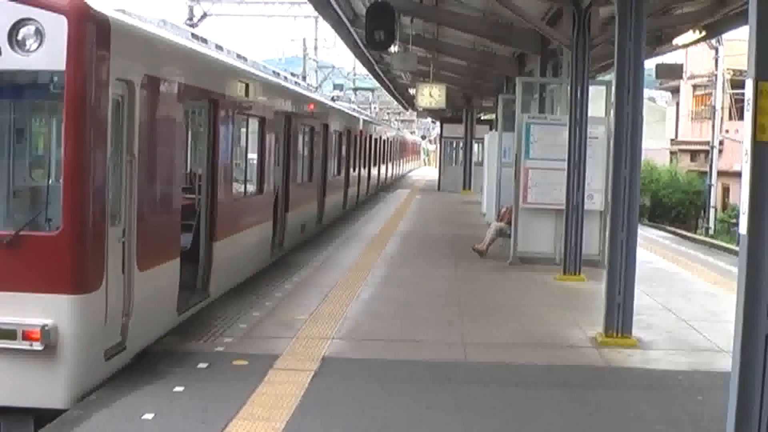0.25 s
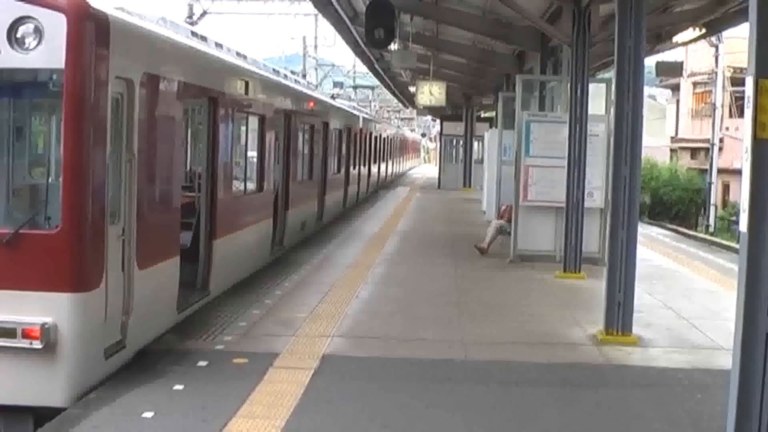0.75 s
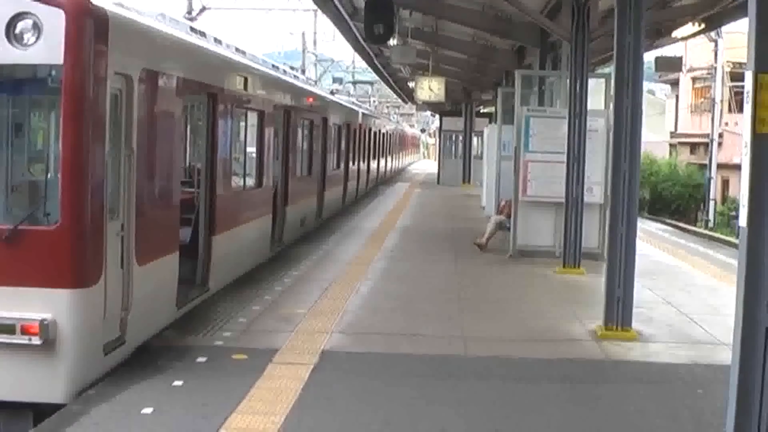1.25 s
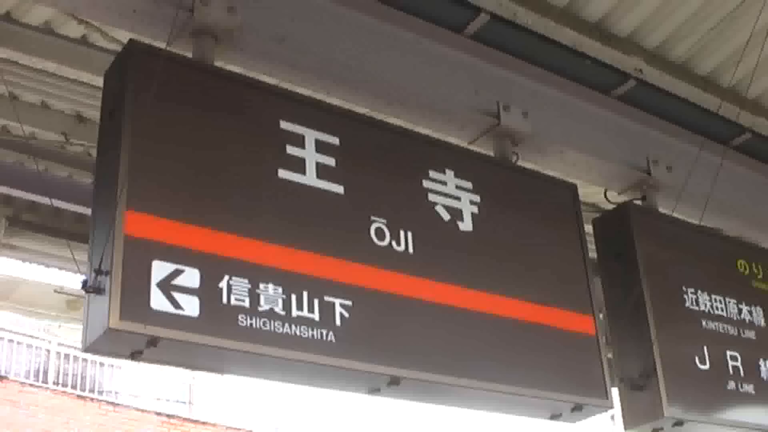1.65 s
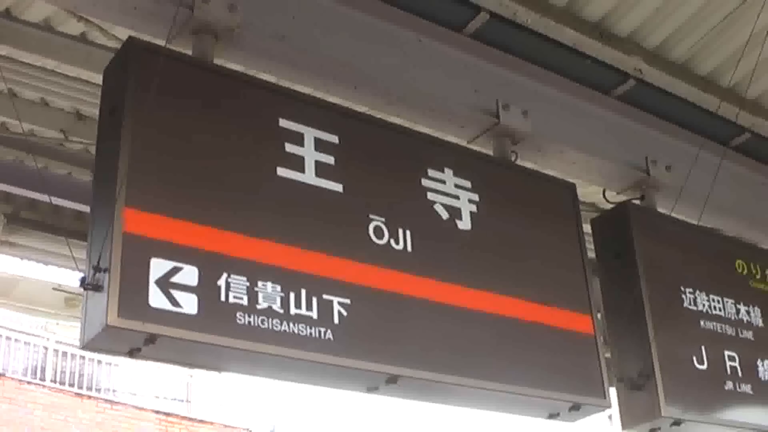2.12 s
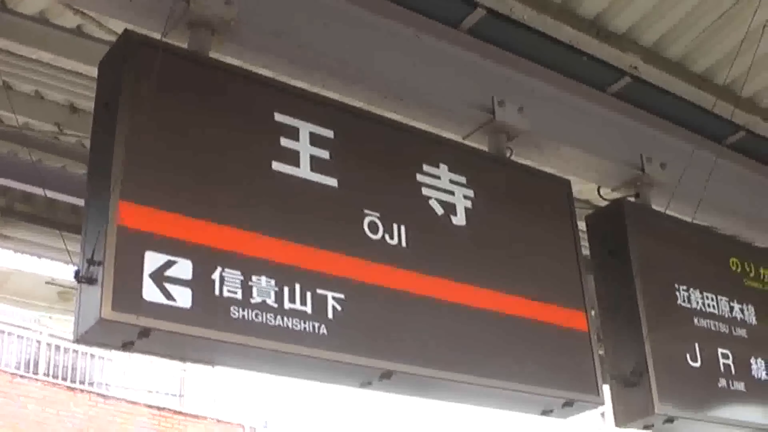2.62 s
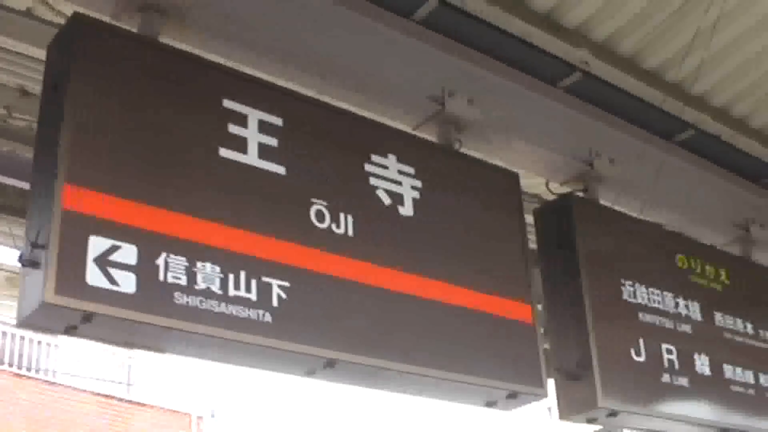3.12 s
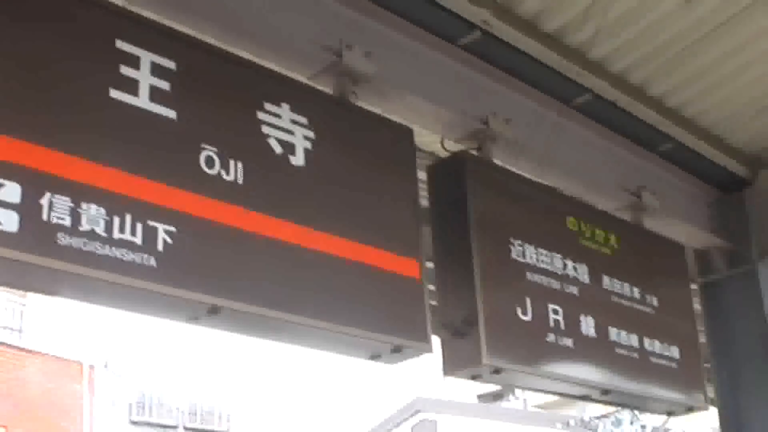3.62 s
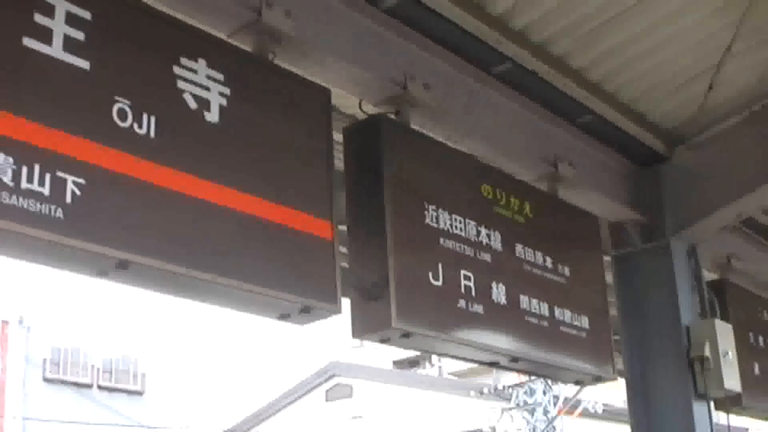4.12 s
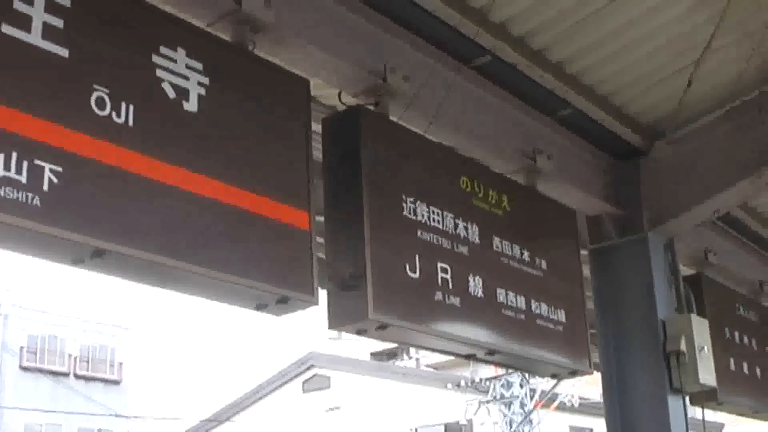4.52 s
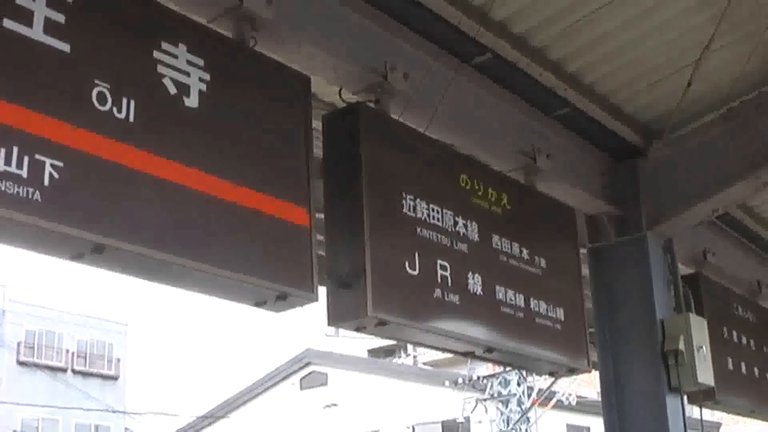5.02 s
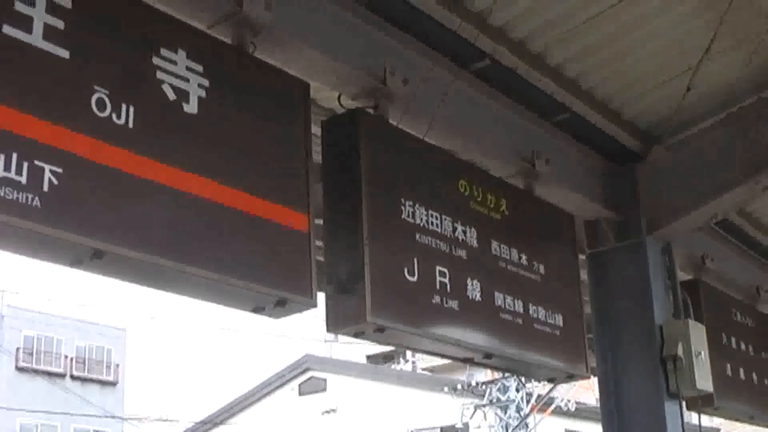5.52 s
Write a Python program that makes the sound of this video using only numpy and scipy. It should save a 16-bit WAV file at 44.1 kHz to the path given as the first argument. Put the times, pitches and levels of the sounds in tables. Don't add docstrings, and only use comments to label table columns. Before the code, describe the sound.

A train's cooling fans blow a broad, low whoosh with a quick air-valve puff early on, then a brief dropout leads to a louder, more diffuse whoosh.

```python
import sys
import numpy as np
from scipy import signal
from scipy.fft import rfft, irfft, dct
from scipy.io import wavfile
from scipy.ndimage import uniform_filter1d

SR = 44100
rng = np.random.default_rng(int(sys.argv[2]) if len(sys.argv) > 2 else 0)


def ratio_of_db(decibels):
    return 10 ** (np.asarray(decibels, float) / 20)


def materialize(psi):
    bounded = np.clip(np.atleast_2d(psi).T, -1, 1)
    quanta = np.round(bounded * 32767).astype(np.int16)
    wavfile.write(sys.argv[1], SR, quanta)


N = 254016
CHANGE_S = 1.6
HOP = 2048

# frequency in Hz, left minus right in dB.
LEAN_END_CAR = [(60, 0.5), (210, 0.0), (710, -1.0), (2440, -2.0), (8370, -0.5)]

CRACK_S, CRACK_RISE_S, LEAK_DB = 0.305, 0.0091, -40
SNAP_S, SNAP_RISE_S, BLAST_DB = 0.352, 0.012, -29
BLOWDOWN_DB_PER_S, BLEED_DB, BLEED_DB_PER_S, SHUT_DB = 97.5, -46, 18.5, -92


def rms_one(x):
    return x / np.sqrt(np.mean(x ** 2) + 1e-20)


def in_time(rows):
    seconds, *columns = np.transpose(rows)
    return [np.interp(np.arange(N) / SR, seconds, column) for column in columns]


def at_hz(points, hz):
    table_hz, values = np.transpose(points)
    return np.interp(np.log(hz), np.log(table_hz), values)


def drift(rate):
    pole = np.exp(-80 * np.pi * rate / SR)
    noise = rng.standard_normal(N // 40 + 2002)
    slow = signal.lfilter([1], [1, -2 * pole, pole * pole], noise)[2000:]
    return np.interp(np.arange(N) / 40, np.arange(len(slow)), rms_one(slow))


def airflow(spectrum, ducts, likeness, lean, patchy_db, gust_db):
    hz = np.fft.rfftfreq(N, 1 / SR) + 1
    colour_db = at_hz(spectrum, hz)
    for centre_hz, width_hz, lift_db in ducts:
        colour_db = colour_db + lift_db / (1 + (2 * (hz - centre_hz) / width_hz) ** 2)
    mid, side = rfft(rng.standard_normal((2, N))) * ratio_of_db(colour_db)
    alike = np.clip(at_hz(likeness, hz), 0, 1)
    pair = np.sqrt(1 + alike) * mid + np.sqrt(1 - alike) * side * np.array([[1], [-1]])
    pair = pair * ratio_of_db(np.outer([0.5, -0.5], at_hz(lean, hz)))
    gust = drift(4.3)
    place = np.clip(np.log2(hz / 60) / 1.5, 0, 5)
    out = 0
    for centre in range(6):
        share = np.cos(np.pi / 2 * np.clip(place - centre, -1, 1)) ** 2
        flicker_db = gust_db * gust + patchy_db * drift(7.0)
        out = out + irfft(pair * share, N) * ratio_of_db(flicker_db)
    return out / np.sqrt(np.mean(out.mean(axis=0) ** 2))


def tone(hz, wander_hz, flutter_db):
    cycles = np.cumsum(hz + wander_hz * drift(4.77)) / SR + rng.random()
    return np.sqrt(2) * np.sin(2 * np.pi * cycles) * ratio_of_db(flutter_db * drift(7.9))


def whoosh_beside_end_car():
    # frequency in Hz, level in dB.
    air_colour = [(20, -36.5), (45, -29), (85, -22), (112, -7.5), (185, -7.5), (290, -4.5), (400, -11),
                  (800, -16), (1500, -24), (3000, -29.5), (4500, -38), (6500, -43.5), (8000, -49),
                  (11000, -51)]
    # frequency in Hz, width in Hz, lift in dB.
    casing = [(136, 38, -3.5), (269, 68, 2), (686, 230, 4), (1290, 440, 3)]
    # frequency in Hz, left-right likeness from 0 to 1.
    spread = [(60, 0.94), (250, 0.97), (500, 0.94), (1000, 0.9), (2000, .65), (4000, 0.89), (8000, 0.63)]
    return ratio_of_db(-21.5) * airflow(air_colour, casing, spread, LEAN_END_CAR, patchy_db=-0.08, gust_db=0.62)


def whoosh_under_roof():
    # frequency in Hz, level in dB.
    air_colour = [(20, -51.5), (45, -29.5), (85, -23), (110, -6), (196, -6), (298, -5), (580, -10),
                  (1300, -17.5), (1550, -21), (3000, -28), (4500, -35.5), (6500, -41.5), (8000, -45.5),
                  (11000, -53.5)]
    # frequency in Hz, width in Hz, lift in dB.
    casing = [(128, 9.2, 1.5), (269, 90, 2.5), (453, 130, 1), (1160, 300, 0.5)]
    # frequency in Hz, left-right likeness from 0 to 1.
    spread = [(30, .9), (90, 0.96), (250, 0.97), (500, 0.89), (1000, 0.73), (2000, 0.61), (4000, 0.72),
              (8000, 0.67)]
    # frequency in Hz, left minus right in dB.
    balance = [(60, 1.5), (210, 0.5), (710, -0.5), (2440, -1.5), (8370, 0.0)]
    return ratio_of_db(-17.5) * airflow(air_colour, casing, spread, balance, patchy_db=0.0, gust_db=0.24)


def second_fan_drone():
    return ratio_of_db(-32) * tone(126, wander_hz=3.43, flutter_db=4.2)


def blades(first_db, octave_db):
    blade_hz = 152.8
    first = tone(blade_hz, wander_hz=0.3, flutter_db=0.7)
    octave = tone(2 * blade_hz, wander_hz=4.02, flutter_db=3.0)
    return ratio_of_db(first_db) * first + ratio_of_db(octave_db - 1.0) * octave


def converter():
    # frequency in Hz, level in dB.
    whine = [(57.5, -54.5), (242.2, -32.5), (588, -41), (1412.5, -55.5), (1766, -51), (2353, -57.5),
             (3531.6, -69)]
    return sum(ratio_of_db(db) * tone(hz, wander_hz=0.77, flutter_db=2.3) for hz, db in whine)


def valve_db():
    opening_db, = in_time([
        (CRACK_S, SHUT_DB),
        (CRACK_S + CRACK_RISE_S, LEAK_DB),
        (SNAP_S - SNAP_RISE_S, LEAK_DB),
        (SNAP_S, BLAST_DB),
    ])
    since = np.arange(N) / SR - SNAP_S
    blowdown_db = BLAST_DB - BLOWDOWN_DB_PER_S * since
    bleed_db = BLEED_DB - BLEED_DB_PER_S * since
    return np.where(since < 0, opening_db, np.maximum(blowdown_db, bleed_db))


def vent():
    # frequency in Hz, level in dB.
    jet_colour = [(700, -23), (1500, -1), (2400, 4), (3500, -2.5), (5500, -4.5), (7000, -7.5), (9000, -8.5),
                  (9600, -23.5), (10500, -18), (11200, -32)]
    # frequency in Hz, left-right likeness from 0 to 1.
    jet_spread = [(1000, 0.41), (3000, 0.83), (9000, .6)]
    jet = airflow(jet_colour, [], jet_spread, LEAN_END_CAR, patchy_db=0.9, gust_db=-2.0)
    return ratio_of_db(valve_db()) * jet


def beside_end_car():
    fans = whoosh_beside_end_car() + second_fan_drone() + blades(-34.5, -38.5)
    return fans + converter() + vent()


def under_roof():
    # time in seconds, blade tone level in dB.
    turn_to_crest = [
        (1.63, -24),
        (2.2, -24),
        (3.1, -28),
        (3.7, -22.5),
        (4.6, -18.5),
        (5.76, -19.5),
    ]
    blade_db, = in_time(turn_to_crest)
    return whoosh_under_roof() + blades(blade_db, -29.5)


def scene():
    return np.where(np.arange(N) < CHANGE_S * SR, beside_end_car(), under_roof())


def step_db(s):
    jet_db = 10 * np.log10(uniform_filter1d(ratio_of_db(2 * valve_db()), HOP))
    spot_db, = in_time([(CHANGE_S, -30.7), (CHANGE_S + 0.06, -25.6)])
    masked_db = 0.55 * np.maximum(jet_db + 44, 0)
    return np.interp(s, np.arange(N) / SR, spot_db + masked_db)


def coarse_recorder(x):
    offset = 54
    fast = signal.resample_poly(x, 160, 147)
    count = len(fast) // HOP + 3
    ends = (2 * HOP - offset, (count - 1) * HOP - len(fast) + offset)
    blocks = np.pad(fast, ends, "reflect").reshape(-1, HOP)
    window = np.sin(np.pi * (np.arange(2 * HOP) + 0.5) / (2 * HOP))
    a, b, c, d = np.split(np.hstack([blocks[:-1], blocks[1:]]) * window, 4, axis=1)
    lines = dct(np.hstack([-c[:, ::-1] - d, a - b[:, ::-1]]), type=4, norm="ortho")
    step = ratio_of_db(step_db((np.arange(count) - 1) * HOP / 48000))[:, None]
    rounded = np.round(lines / step) * step
    u, v = np.split(dct(rounded, type=4, norm="ortho"), 2, axis=1)
    frames = np.hstack([v, -v[:, ::-1], -u[:, ::-1], -u]) * window
    joined = (frames[1:, :HOP] + frames[:-1, HOP:]).ravel()[HOP - offset:]
    return signal.resample_poly(joined, 147, 160)[:N]


def low_pass(x):
    return signal.sosfilt(signal.butter(12, 11000, fs=SR, output="sos"), x)


def record(dry):
    fade_out_s, fade_in_s = 1.5546, 1.6175
    gain, = in_time([(fade_out_s, 1), (fade_out_s + 0.014, 0), (fade_in_s, 0), (fade_in_s + 0.0061, 1)])
    left, right = 2.593 * np.tanh(dry * np.clip(gain, 0, 1) / 2.394)
    mid = coarse_recorder((left + right) / 2)
    side = coarse_recorder((left - right) / 2)
    return low_pass(np.array([mid + side, mid - side]))


dry = scene()
out = record(dry)
materialize(out)
```